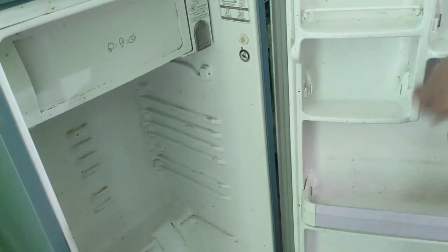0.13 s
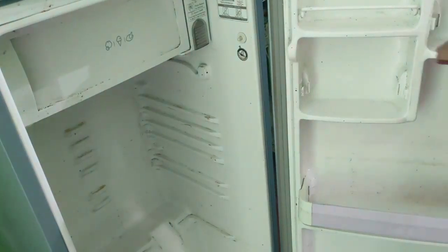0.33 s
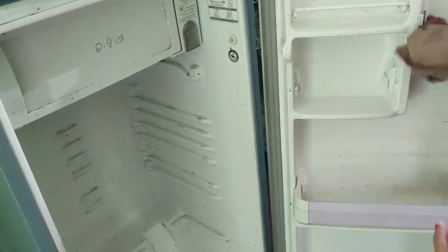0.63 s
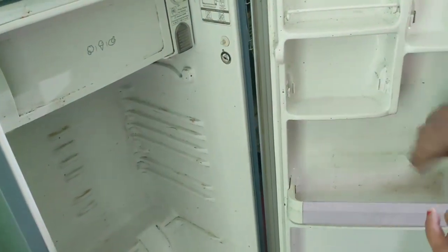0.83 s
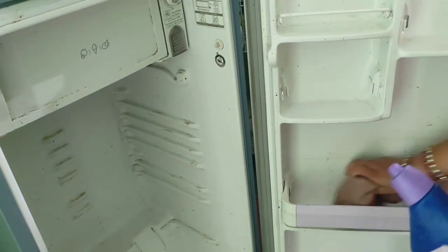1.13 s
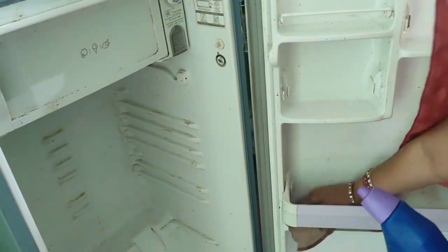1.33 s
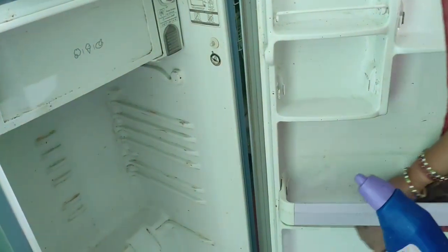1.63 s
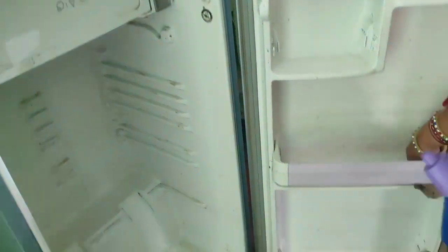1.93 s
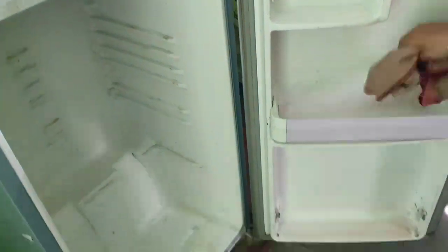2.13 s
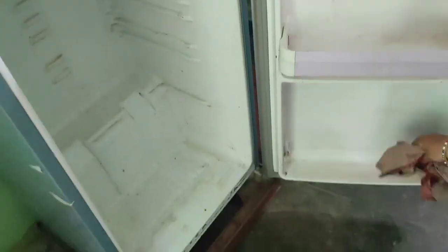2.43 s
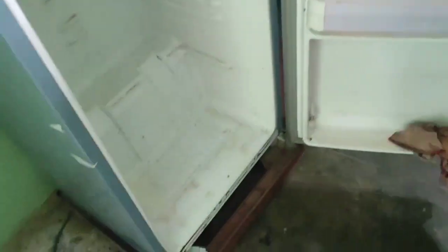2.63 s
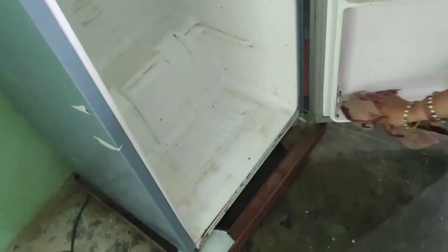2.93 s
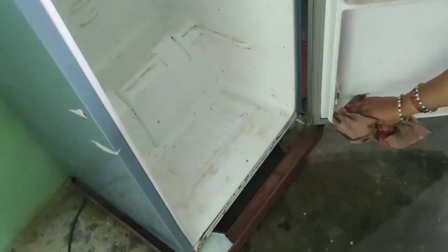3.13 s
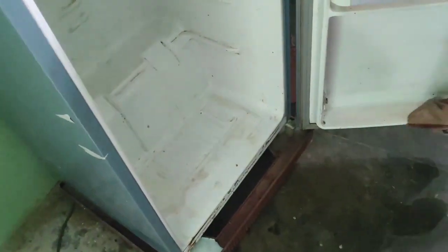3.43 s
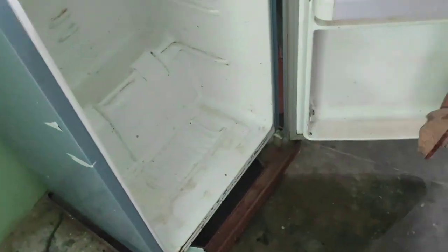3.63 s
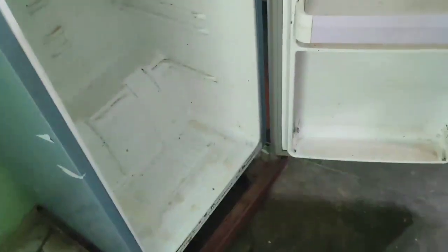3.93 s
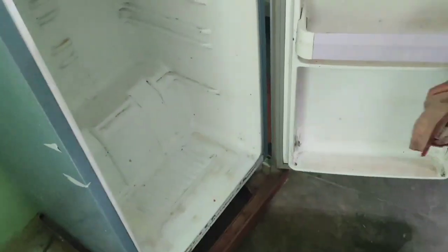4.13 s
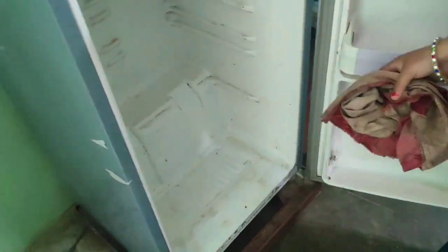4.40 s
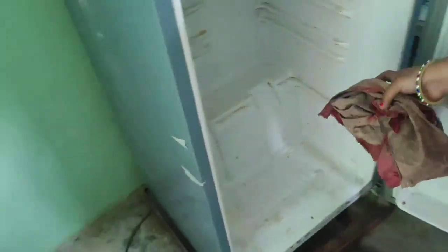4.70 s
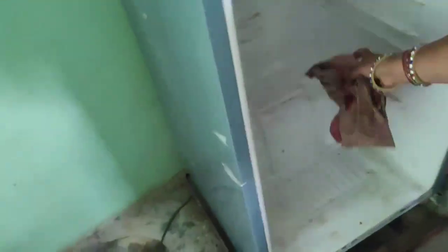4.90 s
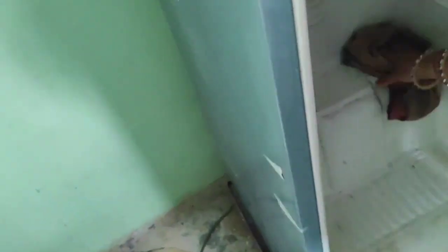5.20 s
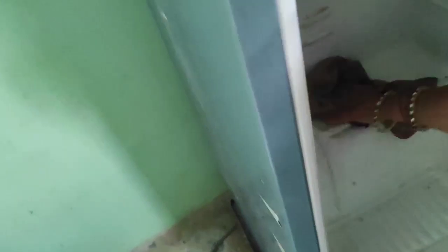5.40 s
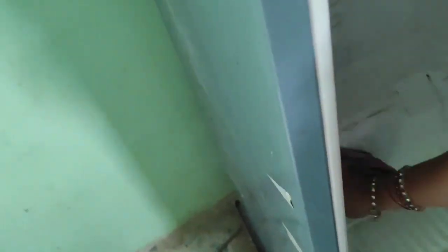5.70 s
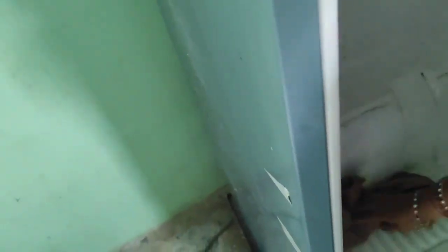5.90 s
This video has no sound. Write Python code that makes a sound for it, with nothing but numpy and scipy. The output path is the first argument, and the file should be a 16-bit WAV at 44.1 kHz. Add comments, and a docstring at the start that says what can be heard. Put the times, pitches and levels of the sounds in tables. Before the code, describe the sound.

Close to a hand-held phone in a small kitchen, a dry cloth swishes over fridge plastic. Pressed strokes soon stutter and drum the hollow door for about a second and a half, mixed with knocks. Lighter sweeps and soft bumps follow, then sharp knocks on door and shelf, a lull with tiny bangle clinks, and renewed wiping ending in a knock. Low air puffs brush the microphone; faint bird chirps come from outside.

```python
"""A dry cloth wipes the plastic inside of an empty refrigerator, close to a hand-held phone in a small kitchen.
Weave and folds hiss from the start, under filtered-noise air and wavering sine glides: faint tones, a bird.
Knocks, low panel notes and bangles, built of noise and decaying tones, join at once; pressed strokes then judder,
slip by slip, drumming the hollow door liner for some two seconds. Lighter sweeps follow, then knocks on door
and shelf, a lull with two clinks, one soft rub, and more wiping that ends in knocks and a short pressed stroke."""
import sys
import numpy as np
from scipy import signal
from scipy.fft import rfft, irfft
from scipy.io import wavfile
from scipy.ndimage import uniform_filter1d

SR = 44100
rng = np.random.default_rng(int(sys.argv[2]) if len(sys.argv) > 2 else 0)


def store_pcm(level_fs):
    """Save levels as 16-bit WAV."""
    pcm = np.round(np.clip(level_fs, -1, 1) * 32767).astype(np.int16)
    wavfile.write(sys.argv[1], SR, np.atleast_2d(pcm).T)


N = 266893  # samples

# Sweeps of the cloth. Each row: start in s, length in s, fastest at share of length,
# weave hiss in dB and dragging folds in dB, both before the layer trims.
SWEEPS = [(-.04, 0.15, 0.45, -52.5, -42), (0.108, 0.15, 0.18, -67, -50), (0.262, 0.16, 0.66, -56, -44.5),
          (0.399, .22, .45, -44.5, -47), (0.608, .16, .5, -48, -41), (0.759, 0.15, 0.25, -60, -53),
          (0.91, 0.069, 0.69, -53, -47), (0.996, 0.58, 0.25, -52, -47.5), (1.42, 0.28, 0.38, -43, -46),
          (1.58, 0.35, 0.48, -45.5, -43.5), (1.9, 0.22, 0.18, -52, -52), (2.16, 0.3, 0.25, -53, -52),
          (2.506, 0.21, 0.24, -49.5, -49.5), (2.69, 0.41, 0.33, -42.5, -48.5), (3.089, 0.3, 0.27, -45, -47),
          (3.19, .38, .55, -42.5, -52), (3.452, 0.12, 0.62, -65, -42), (3.55, 0.3, 0.23, -59, -53.5),
          (4.371, .63, .65, -58.5, -58.5), (5.039, 0.32, 0.28, -56.5, -54.5),
          (5.233, 0.25, 0.52, -50.5, -52), (5.318, 0.47, 0.36, -43, -42), (5.563, 0.11, 0.32, -48.5, -41),
          (5.732, 0.14, 0.74, -43, -47.5), (5.858, 0.2, 0.66, -49, -46.5)]
# Colour of the weave hiss. Each row: frequency in Hz, level in dB.
HISS_COLOUR = [(200, -9.5), (700, -2.5), (1500, 2.5), (3000, 1), (4200, 0), (5500, -2), (7500, -2),
               (10000, -4), (12500, -9), (15500, -15)]
# Colour the cabinet gives the folds. Each row: frequency in Hz, level in dB.
CABINET_COLOUR = [(150, 1), (300, -9), (440, 2.5), (540, -4), (680, 2.5), (780, -1.5), (900, -2.5),
                  (1100, -6.5), (1400, -6), (2000, -8), (2850, -10), (4000, -12.5), (8000, -53),
                  (15000, -52)]


def slide(hiss_trim_db=-1.0, flutter_db=0.78, fold_flutter_db=0.15):
    """The weave hisses over smooth plastic; folds catch more coarsely and sound in the cabinet."""
    weave = unit(colour(grains(rate_hz=16000, spread_db=0.5), HISS_COLOUR))
    weave *= undb(flutter_db * walk(45))
    folds = unit(colour(grains(rate_hz=3000, spread_db=4.0), CABINET_COLOUR))
    # the hand moves about, so the cabinet's reflections trade places at a steady total power
    places = np.array([walk(9) for _ in range(4)])
    places /= np.linalg.norm(places, axis=0)
    folds = unit(sum(room(folds, wet_db=4.5, t60_s=0.078) * share for share in places))
    folds *= undb(fold_flutter_db * walk(25))
    gains = np.array([sweep(*row[:3]) for row in SWEEPS])
    weave_db, folds_db = np.transpose(SWEEPS)[3:]
    return weave * together(gains, weave_db + hiss_trim_db) + folds * together(gains, folds_db)


def sweep(start_s, length_s, fastest_share, speed_power=0.69):
    """Friction gain, a power of hand speed: the hand speeds up from rest and slows to rest again."""
    times_s = start_s + length_s * np.array([0, np.clip(fastest_share, .05, .95), 1])
    speed = np.sin(np.pi * np.interp(np.arange(N) / SR, times_s, [0, .5, 1]))
    return np.abs(speed) ** speed_power


# Strokes pressed on the liner, from one light, soft rub to hard judder. Each row: start in s, held in s,
# judder in dB before the layer trims, swell while held in dB, edge grit in dB, give of the door in dB.
PRESSES = [(.68, 0.03, -31, -2, -7.5, -18), (0.914, 0.068, -32.5, -2, -13, 1.5),
           (.98, 0.034, -29, 1.5, -9.5, -6.5), (1.04, 0.12, -32.5, -0.5, -14.5, 6),
           (1.175, 0.041, -30.5, 4, -5.5, -3), (1.413, 0.084, -27, 0, -2.5, 3),
           (1.515, 0.034, -26, -4, -1.5, 4.5), (1.62, 0.23, -41, 1.5, 0, -16),
           (1.838, 0.026, -28.5, 1.5, -0.5, 0.5), (1.952, 0.074, -24.5, 0.5, -5, -1),
           (2.148, 0.083, -31, 6.5, -14.5, -29), (4.77, 0.062, -49.5, 1, -3, -16),
           (5.803, 0.012, -34.5, 3, -6, -8.5)]
# Ringing of the door liner. Each row: frequency in Hz and level in dB, both before random detail, t60 in s.
LINER_MODES = [(136.8, -13, 0.29), (208.5, 11, 1), (270, -33, 0.21), (336.5, 12, 0.54), (442, 25, 0.39),
               (496.6, -38, 0.84), (690, -21, 0.14), (760, -31, 0.98), (820, 8, 0.57), (1438, 16.5, 0.3),
               (1480, 13, 0.24), (1576, -17, 0.12), (1880, -18, 0.23), (1956, 26.5, 0.099),
               (2250, 18, 0.24), (2470, 0, 0.13), (2440, -12, 0.18), (2424, 20, 0.096), (2520, -27, 0.15),
               (4700, -44, 0.082)]
# Lowest modes of the hollow door. Each row: frequency in Hz and level in dB, both before random detail, t60 in s.
DOOR_MODES = [(101.2, 5.5, 0.2), (139.3, 6, 0.2), (177.4, 1.5, 0.087), (225, -4.5, 0.075),
              (229, -8.5, 0.067), (310, -22, 0.081), (436, -4, 0.073)]
# Colours of drumming (also of dull thuds), scrape and grit. Each row: frequency in Hz, level in dB.
JUDDER_COLOUR = [(50, -24.5), (80, -5.5), (105, -5), (140, -1.5), (185, -2.5), (240, 1), (320, -5.5),
                 (430, -3.5), (700, -31), (1000, -6.5), (1500, -46), (3000, -52), (8000, -80)]
SCRAPE_COLOUR = [(150, -30), (400, 1.5), (600, 5), (1000, 4), (1400, -14.5), (2500, -43), (8000, -77.5)]
GRIT_COLOUR = [(300, -29.5), (900, 9), (1700, -7), (2200, -12.5), (2850, -6.5), (3500, -23.5), (4800, -21),
               (6500, -45), (14000, -41)]


def press(slip_rate_hz=135, slip_spread_db=3, slip_t60_s=.045, steady=0.22, liner_db=-19,
          judder_trim_db=-6.0, door_trim_db=-4.0, scrape_trim_db=-2, grit_trim_db=-2):
    """Under pressure the cloth sticks and slips; each slip drums the door and swells the scraping grit."""
    gap_chance, size_chance = rng.standard_normal((2, 2000))
    times_s = np.cumsum(np.exp(.35 * gap_chance)) / slip_rate_hz
    inside = times_s < N / SR
    slips = np.zeros(N)
    slips[(times_s[inside] * SR).astype(int)] = undb(slip_spread_db * np.clip(size_chance[inside], -2, 1))
    push = slips - slips.mean()
    burst_gain = steady + signal.fftconvolve(slips, fade(slip_t60_s))[:N]
    burst = burst_gain * grains(rate_hz=6000, spread_db=2.5)
    liner = ring(LINER_MODES)

    def through_liner(x, points):
        """Add the liner's ringing to a drive, then colour it."""
        ringing = signal.fftconvolve(x, liner)[:N]
        return unit(colour(x + undb(liner_db) * ringing, points))

    drum = through_liner(push, JUDDER_COLOUR)
    scrape = through_liner(burst, SCRAPE_COLOUR) * undb(0.77 * walk(21.55))
    grit = through_liner(burst, GRIT_COLOUR)
    # the pressing hand holds the door's swing near a steady size
    door = colour(signal.fftconvolve(push, ring(DOOR_MODES))[:N], JUDDER_COLOUR)
    door /= np.sqrt(uniform_filter1d(door ** 2, size=3500) + 1e-12)

    gains = np.array([pressure(start_s, held_s, swell_db) for start_s, held_s, _, swell_db, _, _ in PRESSES])
    _, _, level_db, _, edge_db, give_db = np.transpose(PRESSES)
    rub = drum * together(gains, level_db + judder_trim_db)
    rub += door * together(gains, level_db + door_trim_db + give_db)
    # a harder edge under the cloth brings up the scrape, and the grit twice as much in dB
    rub += scrape * together(gains, level_db + scrape_trim_db + edge_db / 2)
    rub += grit * together(gains, level_db + grit_trim_db + edge_db)
    return room(rub, wet_db=-9, t60_s=.3)


def pressure(start_s, held_s, swell_db, attack_s=.018, release_t60_s=0.41):
    """Gain of one pressed stroke: the cloth bites quickly, leans in or eases off, then lets go."""
    t = np.arange(N) / SR - start_s
    attack = np.clip(t / attack_s, 0, 1)
    swell = undb(swell_db * (np.clip(t / held_s, 0, 1) - .5))
    release = np.exp(-np.log(1000) * np.maximum(t - held_s, 0) / release_t60_s)
    return attack * swell * release


# Knocks on the plastic. Each row: start in s, level of the first 20 ms in dB before reflections,
# treble tilt in dB per octave, chatter decay in s (1 ms at least is played), part struck.
KNOCKS = [(0.328, -39, 1.5, 0.013, "door"), (.686, -31, -2.5, 0.04, "wall"),
          (0.921, -35, -6, 0.0051, "wall"), (1.203, -34, 0.5, 0.0047, "door"),
          (1.263, -33, -5, 0.001, "wall"), (1.427, -32, -1.5, 0.021, "door"),
          (1.847, -33, -0.5, 0.0072, "door"), (1.862, -30.5, -0.5, 0.01, "wall"),
          (1.9531, -28, 2.6, 0.0062, "door"), (2.152, -33.5, -2.5, 0.024, "door"),
          (3.735, -48, 11, 0.00079, "wall"), (3.81, -26.5, 2.5, 0.0085, "door"),
          (3.821, -26, -1.5, 0.05, "door"), (3.88, -31.5, 3.5, 0.0061, "door"),
          (3.915, -37, -2.5, 0.026, "door"), (3.965, -35, -2.5, 0.057, "shelf rim"),
          (4.069, -35.5, -1.5, 0.024, "shelf"), (4.108, -28.5, 2, 0.0059, "shelf"),
          (4.286, -55.5, 9, 0.036, "wall"), (5.061, -49.5, 12, 0.015, "wall"),
          (5.733, -47.5, 9.5, 0.00075, "wall"), (5.83, -34.5, 6, 0.0097, "wall"),
          (5.836, -27.5, -1, 0.0059, "wall")]
# How much a blow on each part sets ringing. Each entry: liner in dB, shelf in dB.
PARTS = {"door": (1, -25), "shelf": (-9, 3), "shelf rim": (-14, 6), "wall": (-18, -30)}
# Ringing of the shelf. Each row: frequency in Hz and level in dB, both before random detail, t60 in s.
SHELF_MODES = [(890, -41, 0.19), (1220, 5, 0.058), (1333.5, 6, 0.43), (1374, -1, 0.48), (1398, -15.5, 0.49),
               (1420, -16, 0.29), (1980, -47, .14), (3200, 4, 0.092), (3120, 12, 0.026), (3300, 9, 0.032),
               (4450, -5, .08)]
# Colours of the blow and of the hollow cabinet's lingering ring. Each row: frequency in Hz, level in dB.
KNOCK_COLOUR = [(50, -2), (130, 6.5), (400, 3.5), (900, 0), (1700, -3), (2800, -7), (3800, -15),
                (4700, -15), (6500, -25.5), (11000, -34), (15000, -51)]
HOLLOW_COLOUR = [(80, -34), (200, -12), (650, 4), (1000, 6.5), (2500, -1), (8000, -55)]


def knocks(ring_db=-15, hollow_db=-8, hollow_t60_s=0.24, rattle_db=3.5,
           rebound_db=2.2, rebound_rate_hz=170, contact_s=0.00057):
    """A blow and a brief chatter of loose plastic; liner and shelf ring on. Harder contact is brighter."""
    out, t = np.zeros(N), np.arange(SR // 2) / SR
    for start_s, level_db, tilt_db, chatter_s, part in KNOCKS:
        liner_db, shelf_db = PARTS[part]
        force = rng.standard_normal(len(t)) * np.exp(-t / max(chatter_s, .001))
        # the contact builds up, then the loose part rebounds unevenly
        force *= 1 - np.exp(-t / contact_s)
        force *= undb(rebound_db * walk(rebound_rate_hz)[:len(t)])
        # the shelf sits loose, so its ring flutters
        shelf = ring(SHELF_MODES) * undb(rattle_db * walk(92)[:len(t)])
        modes = undb(liner_db) * ring(LINER_MODES) + undb(shelf_db) * shelf
        blow = force + undb(ring_db) * np.linalg.norm(force) * modes
        add(out, start_s, struck(colour(blow, KNOCK_COLOUR, tilt_db), level_db))
    hollow = undb(hollow_db) * reverb(colour(out, HOLLOW_COLOUR), hollow_t60_s)
    return room(out, wet_db=-8, t60_s=.42) + hollow


# Low panel notes: soft bumps, and the hollow body of some knocks.
# Each row: start in s, level of the first 20 ms in dB before reflections, pitch in Hz.
PANEL_NOTES = [(0.271, -39, 165), (.326, -38.5, 626), (2.201, -34, 227), (2.634, -43.5, 178),
               (2.834, -28.5, 275.6), (2.947, -41, 199), (3.006, -36.5, 125), (3.18, -40.5, 251),
               (3.374, -39, 133), (3.515, -35.5, 173), (3.813, -32.5, 223), (3.817, -33, 412),
               (4.109, -37.5, 137), (5.838, -34, 497), (5.844, -38.5, 137), (5.961, -45.5, 436)]


def panel_notes(thud_db=-11, note_t60_s=0.12):
    """A hollow panel gives a low decaying note and a dull thud: a soft bump, or the body under a knock."""
    out, t = np.zeros(N), np.arange(SR // 2) / SR
    envelope = fade(note_t60_s) * (1 - fade(.03))
    for start_s, level_db, pitch_hz in PANEL_NOTES:
        note = np.sin(2 * np.pi * pitch_hz * t)
        thud = undb(thud_db) * unit(colour(rng.standard_normal(len(t)), JUDDER_COLOUR))
        add(out, start_s, struck((note + thud) * envelope, level_db))
    return room(out, wet_db=-13, t60_s=.35)


# Bangles touching. Each row: start in s, ring level in dB before tick and reflections,
# centre of the lower ring in Hz, centre of the upper ring in Hz, t60 in s.
CLINKS = [(0.332, -51, 11150, 14900, 0.048), (.771, -53.5, 13000, 15370, .16),
          (3.547, -47.5, 9500, 15200, 0.039), (3.883, -53, 10200, 12600, 0.066),
          (3.952, -56, 12700, 15400, 0.25), (4.325, -53.5, 9070, 13600, 0.29),
          (4.371, -56.5, 9114, 12510, 0.18)]


def bangles(upper_db=-5, tick_db=-1, detune=0.0163):
    """Small metal beads, each a little different in size, tick and ring very high."""
    out = np.zeros(N)
    for start_s, level_db, low_hz, high_hz, t60_s in CLINKS:
        beads = 1 + detune * np.linspace(-1, 1, num=6) * rng.uniform(0.31, 1, size=6)
        modes = [(low_hz * bead, 0, t60_s) for bead in beads]
        modes += [(high_hz * bead, upper_db, t60_s) for bead in beads]
        tone = struck(ring(modes), 0)
        tick = colour(rng.standard_normal(SR // 2) * fade(0.021), [(2000, -47), (9000, 20), (15000, 10)])
        add(out, start_s, struck(tone + struck(tick, tick_db), level_db))
    return room(out, wet_db=-4, t60_s=0.25)


# Distant bird, then faint tones from outside. Each row: start in s, length in s,
# start and end pitch in Hz before the waver, peak level in dB before reflections.
CHIRPS = [(0.07, 0.069, 5580, 5030, -56), (2.168, 0.06, 5580, 6200, -55), (2.305, 0.052, 7370, 7700, -51),
          (4.67, 0.115, 8300, 7700, -62), (4.8, .06, 7450, 7340, -69)]
TONES = [(.02, 0.28, 650, 714, -52), (.31, 0.15, 660, 675, -49), (4.33, 0.26, 2950, 2750, -63)]


def glides(rows, waver_rate_hz):
    """Thin wavering sine glides, smeared by the walls on their way in."""
    out, waver = np.zeros(N), walk(waver_rate_hz)
    for start_s, length_s, start_hz, end_hz, level_db in rows:
        n = int(length_s * SR)
        hz = np.linspace(start_hz, end_hz, n) * (1 + .022 * waver[:n])
        tone = np.sin(2 * np.pi * np.cumsum(hz) / SR)
        add(out, start_s, undb(level_db) * np.hanning(n) * tone)
    return room(out, wet_db=0, t60_s=.35)


# Puffs of air on the moving microphone. Each row: strongest at s, width (standard deviation) in s, level in dB.
GUSTS = [(.275, 0.011, -33), (.35, 0.037, -33.5), (1.53, 0.033, -33), (2.0, .05, -41), (2.507, 0.033, -28),
         (2.69, 0.066, -30.5), (2.91, 0.045, -36), (3.66, 0.071, -30.5), (3.92, 0.061, -37),
         (4.82, 0.036, -28), (5.34, 0.042, -29.5)]
# Colours of the air rumble and of the quiet kitchen. Each row: frequency in Hz, level in dB.
AIR_COLOUR = [(10, -2.5), (22, 1.5), (40, -11), (60, -11.5), (100, -22), (200, -29), (600, -64)]
KITCHEN_COLOUR = [(24, -40), (40, -7), (98, -1.5), (146, -6), (325, -16.5), (377, -12), (973, -24),
                  (1050, -21.5), (2160, -29.5), (2770, -25), (3560, -33.5), (6160, -34.5), (15500, -41)]


def background(draught_db=-42.5, kitchen_db=-51.5):
    """Air rumbles on the moving microphone, swelling in puffs, over the quiet of the kitchen."""
    t = np.arange(N) / SR
    air = unit(colour(rng.standard_normal(N), AIR_COLOUR))
    air /= np.sqrt(uniform_filter1d(air ** 2, size=5000))  # even out, so the puffs set the level
    puffs = sum(undb(level_db) * np.exp(-.5 * ((t - peak_s) / width_s) ** 2) for peak_s, width_s, level_db in GUSTS)
    quiet = unit(colour(rng.standard_normal(N), KITCHEN_COLOUR)) * undb(0.5 * walk(12.0))
    return air * np.hypot(puffs, undb(draught_db)) + quiet * undb(kitchen_db)


def grains(rate_hz, spread_db):
    """Fibres snapping free: many tiny clicks and a few larger ones."""
    size = undb(spread_db * np.minimum(rng.exponential(size=N), 6)) * rng.standard_normal(N)
    return unit(size * (rng.random(N) < rate_hz / SR))


def ring(modes, detune=0.0128, place_db=3.5):
    """Unit-energy sum of decaying modes; chance in place and load weights and detunes each one."""
    t = np.arange(SR // 2) / SR
    y = np.zeros(len(t))
    for (hz, level_db, t60_s), (place, load, phase) in zip(modes, rng.uniform(-0.65, 1, (len(modes), 3))):
        tone = np.sin(2 * np.pi * hz * (1 + detune * load) * t + np.pi * phase)
        y += undb(level_db + place_db * place) * fade(t60_s) * tone
    return y / np.linalg.norm(y)


def struck(x, level_db, size=880):
    """Set the rms level of a blow by its first 20 ms."""
    return x * undb(level_db) / np.sqrt(np.mean(x[:size] ** 2))


def room(x, wet_db, t60_s):
    """A sound with its reflections from the walls around it."""
    return x + undb(wet_db) * reverb(x, t60_s)


def reverb(x, t60_s):
    """Dense reflections with unit energy that build up over a few milliseconds."""
    tail = rng.standard_normal(SR // 2) * fade(t60_s) * (1 - fade(0.007))
    return signal.fftconvolve(x, tail / np.linalg.norm(tail))[:len(x)]


def fade(t60_s):
    """Half a second of exponential decay."""
    return np.exp(-np.log(1000) * np.arange(SR // 2) / SR / t60_s)


def walk(rate_hz):
    """Smoothed random steps at the given rate, scaled to rms 1."""
    k = max(int(SR / rate_hz), 1)
    steps = np.repeat(rng.standard_normal(N)[:N // k + 1], k)
    return unit(uniform_filter1d(steps, k)[:N])


def colour(x, points, tilt_db=0, size=8192):
    """Causal minimum-phase filter through (Hz, dB) points, tilted by dB per octave."""
    octave = np.log2(np.maximum(np.arange(size // 2 + 1), 1) * SR / size)
    hz, db = np.transpose(points)
    curve_db = np.interp(octave, np.log2(hz), db) + tilt_db * (octave - octave.mean())
    # folding the cepstrum onto positive time makes the filter causal
    cepstrum = irfft(np.log(undb(curve_db)))
    cepstrum[1:size // 2] *= 2
    cepstrum[size // 2 + 1:] = 0
    return signal.fftconvolve(x, irfft(np.exp(rfft(cepstrum))))[:len(x)]


def together(gains, level_db):
    """Joint gain of overlapping strokes, each at its own level: their powers add."""
    return np.sqrt(undb(level_db) ** 2 @ gains ** 2)


def add(track, start_s, sound):
    """Mix a sound into a track at a start time."""
    i = max(int(start_s * SR), 0)
    track[i:i + len(sound)] += sound[:max(N - i, 0)]


def unit(x):
    """Scale to rms 1."""
    return x / np.sqrt(np.mean(x ** 2) + 1e-18)


def undb(db):
    """Decibels to gain."""
    return 10 ** (np.asarray(db) / 20)


def scene():
    """Everything reaches one microphone."""
    wiping = slide() + press()
    contacts = knocks() + panel_notes() + bangles()
    outside = glides(CHIRPS, waver_rate_hz=170) + glides(TONES, waver_rate_hz=33)
    return (wiping + contacts + outside + background())[None]


def record(dry, top_hz=15750):
    """The phone cuts the top with a steep elliptic low-pass."""
    return signal.sosfilt(signal.ellip(10, .2, 80, top_hz, fs=SR, output="sos"), dry)


dry = scene()
out = record(dry)
store_pcm(out)
```